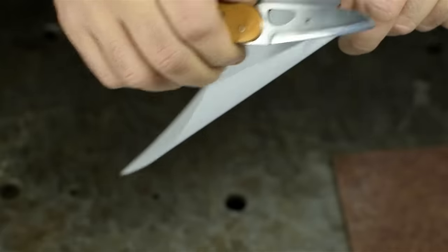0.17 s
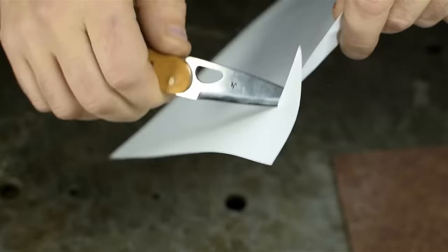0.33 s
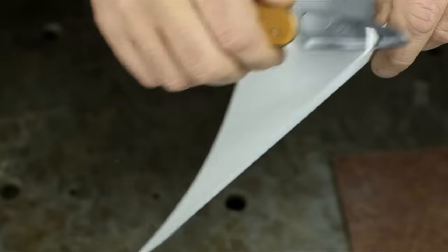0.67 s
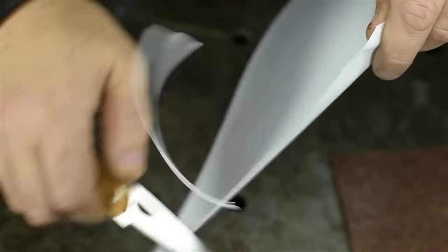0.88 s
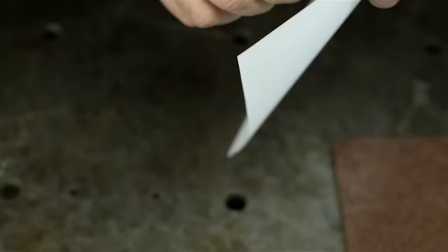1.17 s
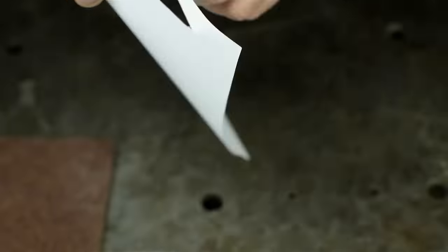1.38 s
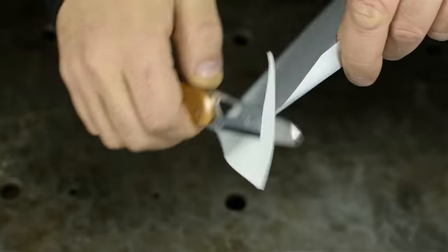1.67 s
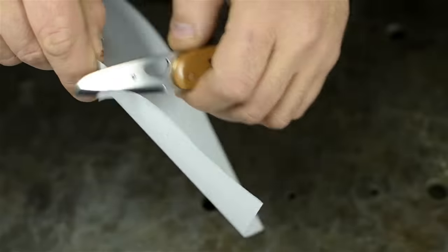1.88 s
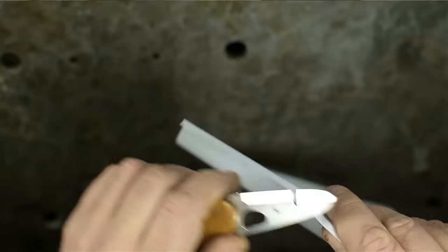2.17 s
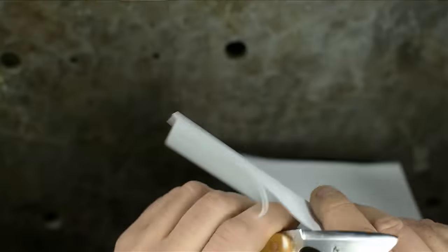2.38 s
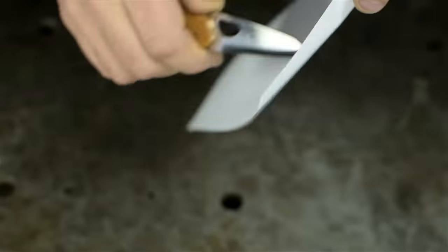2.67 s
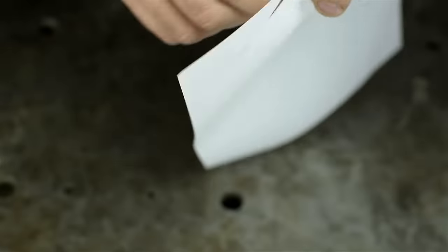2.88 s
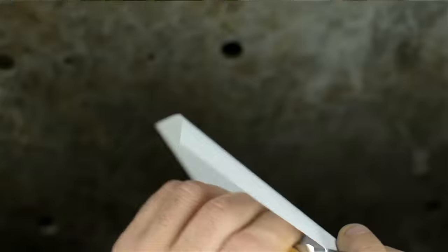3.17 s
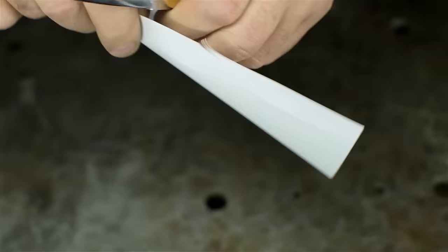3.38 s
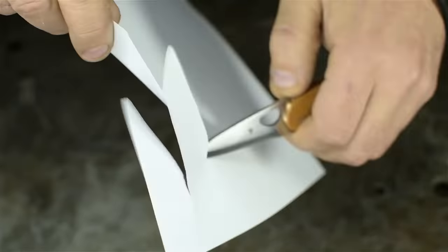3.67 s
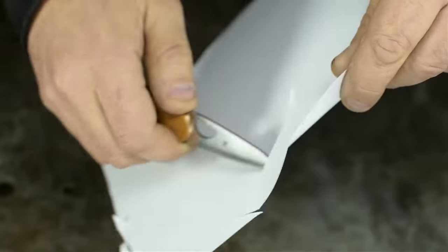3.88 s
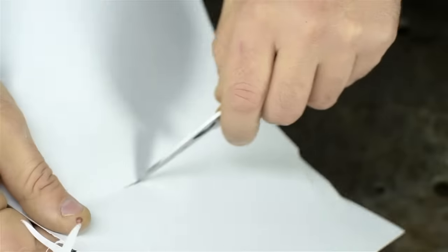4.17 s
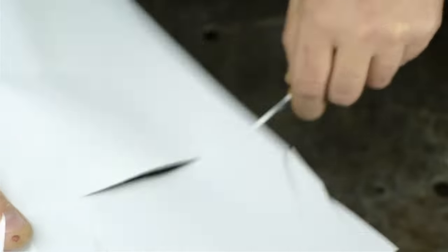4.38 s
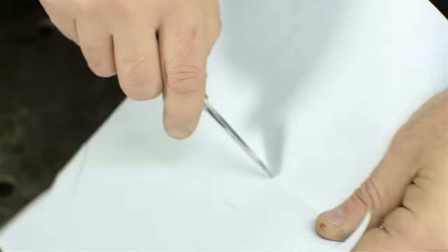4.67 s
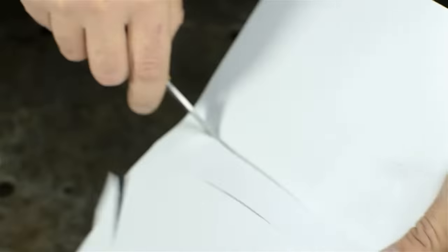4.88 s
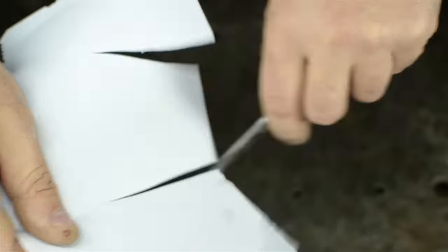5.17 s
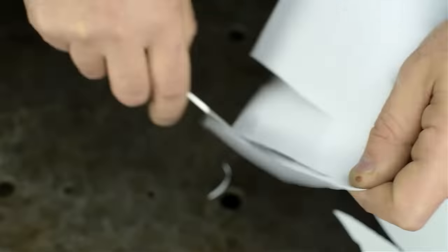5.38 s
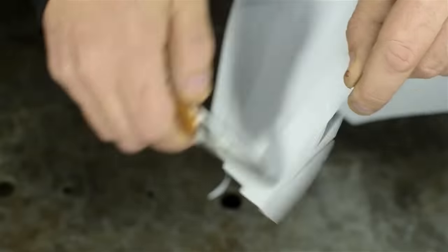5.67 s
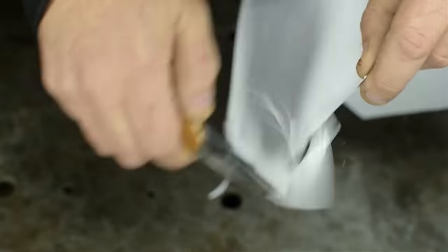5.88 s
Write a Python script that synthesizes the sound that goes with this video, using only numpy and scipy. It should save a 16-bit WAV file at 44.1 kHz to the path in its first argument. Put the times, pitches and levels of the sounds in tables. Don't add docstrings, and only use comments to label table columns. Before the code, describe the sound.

A knife shaves strips from a hand-held sheet of paper, very close to a small, thin-bassed microphone. Fast rasping strokes crackle and ring the sheet, with sharp ticks at bites and releases. The middle strokes grow brighter and hissier, then come long slits, faint rustles and a few last flicks. The quiet room adds only a short, dull tail.

```python
import sys
import numpy as np
from scipy import signal
from scipy.fft import rfft, irfft, next_fast_len
from scipy.io import wavfile
from scipy.ndimage import uniform_filter1d, map_coordinates

SR = 44100
rng = np.random.default_rng(int(sys.argv[2]) if len(sys.argv) > 2 else 0)


def decibels_to_gain(level_db):
    exponent = np.asarray(level_db, float) / 20
    return 10 ** exponent


def store_wav(level_fs):
    pcm = np.round(np.clip(np.atleast_2d(level_fs), -1, 1) * 32767)
    wavfile.write(sys.argv[1], SR, pcm.T.astype(np.int16))


N = 266319
HOP = 32

SETUP_START_S = [
    1.02,
    2.62,
    3.16,
    4.08,
    5.52,
]


def level(x, db):
    return x * decibels_to_gain(db) / np.sqrt(np.mean(x ** 2))


def shape_db(points, hz):
    f, db = np.transpose(points)
    return np.interp(np.log(hz), np.log(f), db)


def walk(rate, count=1):
    k = int(SR / HOP / rate)
    held = np.arange(N // HOP + 1) // k % 2000
    steps = rng.standard_normal((count, 2000))[:, held]
    return 1.025 * uniform_filter1d(uniform_filter1d(steps, k), k)


def glide(control):
    return np.interp(np.arange(N) / HOP, np.arange(len(control)), control)


def band(spectrum, hz, octaves):
    size = next_fast_len(N)
    bin_hz = np.maximum(np.arange(len(spectrum)) * SR / size, 1)
    away = np.log2(bin_hz / hz) / octaves
    return level(irfft(spectrum * np.cos(np.pi / 2 * np.clip(away, -1, 1)), size)[:N], 0)


def air():
    # pitch_hz, level_db (per Hz)
    air_colour = [(18, -39), (30, -30.5), (195, -5), (1140, -6.5), (2030, -12), (3230, -11), (10200, -19.5),
                  (15000, -36)]
    size = next_fast_len(N)
    hz = np.maximum(np.arange(size // 2 + 1) * SR / size, 1)
    white = rfft(rng.standard_normal(size))
    tone = level(irfft(white * decibels_to_gain(shape_db(air_colour, hz)), size)[:N], -78.5)
    tone = tone * decibels_to_gain(glide(walk(8.4)[0]))
    hum_db = np.where(np.arange(N) / SR < SETUP_START_S[0], -92, -104)
    return tone + band(white, 98, 0.99) * decibels_to_gain(hum_db)


def snaps():
    # time_s, peak_db, ring_hz, top_db (relative)
    snap_events = [(0.0345, -59, 1900, -21), (0.0408, -60, 1000, -23), (0.1942, -43, 3700, -7),
                   (0.3069, -18, 2300, -8), (0.3915, -34, 3400, 6), (0.4568, -42, 2900, -9),
                   (0.5095, -26, 1300, -17), (0.5429, -23, 1300, -12), (0.5625, -28, 800, -20),
                   (0.76, -28, 1300, -15), (0.9387, -28, 1600, -28), (1.0465, -51, 3600, -17),
                   (1.265, -26, 2500, -14), (1.6023, -20, 4700, -18), (1.7815, -24, 3900, -13),
                   (1.8667, -21, 2700, -21), (1.927, -21, 3300, -14), (2.135, -24, 2600, -26),
                   (2.1637, -24, 3200, -18), (2.3982, -43, 3900, -11), (2.5502, -21, 3900, -20),
                   (2.5721, -34, 3400, -12),
                   (2.7215, -29, 4000, -8), (2.8842, -26, 5000, -5), (3.1022, -36, 4700, -4),
                   (3.1171, -40, 4100, -7), (3.398, -35, 3200, -9), (3.4162, -30, 2700, -11),
                   (3.4818, -45, 2800, -9), (3.562, -23, 4400, -14), (4.0587, -41, 4400, -5),
                   (4.4092, -33, 2600, -21), (4.4242, -38, 2300, -13), (4.4489, -43, 2200, -23),
                   (4.5075, -54, 3500, -15), (4.5544, -51, 3000, -16), (4.7917, -25, 1700, -8),
                   (4.832, -23, 1400, -12), (5.0505, -43, 2100, -22), (5.0708, -32, 2800, -13),
                   (5.4246, -24, 4300, 5), (5.4485, -32, 2700, -25), (5.5782, -33, 4700, 1),
                   (5.5875, -36, 3500, -6), (5.981, -46, 2700, -11)]
    events = snap_events
    out, t = np.zeros(N + 1024), np.arange(1024) / SR
    chance = rng.standard_normal((len(events), 1024))
    for (s, db, hz, top_db), noise in zip(events, chance):
        cycles = hz * t - 1
        ring = 1.1 * np.cos(2 * np.pi * cycles) * np.exp(-(cycles / .7) ** 2)
        ring = ring * decibels_to_gain(-max(top_db + 8, 0))
        crack = np.diff(noise, prepend=0) * np.exp(-np.abs(t - 1 / hz) / .0002)
        tail = noise * np.exp(-t / 0.0021)
        i = int((s - 1 / hz) * SR)
        out[i:i + 1024] += decibels_to_gain(db) * (ring + .5 * decibels_to_gain(min(top_db, 0)) * crack + .05 * tail)
    return signal.sosfilt(signal.butter(2, 500, "high", fs=SR, output="sos"), out[:N])


def squeals():
    # time_s, length_s, start_hz, end_hz, level_db, roughness (0-1)
    songs = [(0.11, 0.027, 3920, 3920, -73.5, 0.3), (1.745, 0.039, 1900, 1500, -39, 0.9),
             (4.46, 0.17, 3130, 3130, -76, 0.5), (4.5, 0.11, 6100, 6150, -72, 1),
             (4.778, 0.036, 1145, 1370, -33, 0), (0.36, .055, 880, 630, -56.5, 0.9),
             (.27, 0.046, 610, 900, -47, 0.7), (5.37, 0.066, 600, 450, -60.5, 0.84),
             (1.76, 0.031, 470, 610, -62, 1), (2.52, 0.035, 760, 720, -51.5, 1),
             (3.546, 0.043, 490, 470, -61.5, .8), (3.665, 0.068, 500, 460, -60, 0.4)]
    out, wobble = np.zeros(N), walk(180, count=2)
    slip = glide(wobble[0]) + 1j * glide(wobble[1])
    for s, length, start_hz, end_hz, db, rough in songs:
        i, n = int(s * SR), int(length * SR)
        phase = 2 * np.pi * np.cumsum(np.linspace(start_hz, end_hz, n)) / SR
        stumble = 1 + rough * slip[i:i + n]
        out[i:i + n] += decibels_to_gain(db) * np.hanning(n) ** .5 * np.real(stumble * np.exp(1j * phase))
    return out


def effort(t):
    # start_s (blade enters), full_s (full bite), end_s (blade leaves)
    stroke_times = [(.186, .27, .348), (.45, .48, .626), (.665, .756, .91), (1.05, 1.13, 1.208),
                    (1.24, 1.3, 1.406), (1.42, 1.44, 1.538), (1.585, 1.612, 1.73), (1.87, 1.924, 1.97),
                    (1.93, 1.964, 2.096), (2.157, 2.17, 2.262), (2.388, 2.432, 2.515), (2.49, 2.518, 2.547),
                    (2.63, 2.68, 2.736), (2.785, 2.83, 2.888), (2.925, 2.97, 3.052), (3.158, 3.25, 3.35),
                    (3.46, 3.56, 3.715), (3.76, 3.814, 3.88), (3.82, 3.88, 4.042), (4.145, 4.172, 4.206),
                    (4.214, 4.229, 4.388), (4.764, 4.785, 4.953), (5.082, 5.108, 5.198),
                    (5.301, 5.375, 5.424)]
    # full_db, end_db, then relative flex_db (sheet), hiss_db (edge), fizz_db (fibres)
    stroke_levels = [(-41.5, -39, -7, -7.5, -2.5), (-47, -38, -9, -7, -1.5), (-40.5, -38.5, -9, -5, 2),
                     (-41.5, -37.5, -14.5, -1.5, -4), (-36, -43, -12.5, -4, -10),
                     (-40.5, -39.5, -12, -1.5, -9.5), (-47, -40.5, -14, -0.5, -2),
                     (-37.5, -36.5, -15, -8.5, -10.5), (-37.5, -32.5, -11.5, -3.5, -4.5),
                     (-41.5, -45, -16.5, 4, -2), (-40, -42.5, -21, 3.5, 2), (-33, -36, -15.5, 0.5, -7),
                     (-45, -44.5, -16.5, -0.5, -4), (-46.5, -43, -23, 1, 0.5), (-52, -41, -19, 4, 2.5),
                     (-44.5, -36, -12.5, -1.5, -1.5), (-47, -43, -7, -1, -4), (-42, -43, -15.5, -2, -3.5),
                     (-46.5, -46, -13, -0.5, -2), (-42.5, -43, -8.5, 4.5, 2.5), (-42.5, -47, -2, 5.5, 2.5),
                     (-43, -47, 0.5, 4.5, 5), (-39, -42, -6, 1.5, -2), (-35.5, -41, -7, -1, -7)]
    # start_s, end_s
    drag_times = [(.372, .403), (.92, .95), (1.7, 1.792), (1.836, 1.886), (2.296, 2.312), (2.548, 2.58),
                  (2.728, 2.79), (3.045, 3.145), (3.33, 3.385), (3.398, 3.419), (3.438, 3.48),
                  (3.72, 3.755), (4.048, 4.066), (4.088, 4.155), (4.385, 4.452), (4.45, 4.56),
                  (4.55, 4.635), (4.625, 4.722), (4.728, 4.762), (5.044, 5.09), (5.296, 5.36),
                  (5.428, 5.452), (5.535, 5.562), (5.568, 5.648), (5.66, 5.69), (5.704, 5.76), (5.8, 5.857),
                  (5.9, 5.927), (5.932, 5.95), (5.96, 6.03)]
    # first_db, last_db, brightness_db
    drag_levels = [(-65, -56, -6.5), (-42.5, -46, -12), (-43, -40.5, -8), (-47.5, -50.5, -8),
                   (-58.5, -68, -2), (-43, -54, -16), (-55, -58.5, 4), (-48.5, -64.5, 0), (-38, -45.5, 0),
                   (-42, -50, -2.5), (-59, -71, -17), (-49.5, -53, 1.5), (-67, -56, 5.5), (-72.5, -63, 13),
                   (-52, -63, -5), (-76, -80, -2.5), (-76.5, -61, 4), (-56, -45.5, 1.5), (-43.5, -39, 2),
                   (-58.5, -51.5, 2), (-48.5, -39.5, 0), (-62, -66, -10), (-70, -73, 9.5), (-49, -54, 5),
                   (-77, -59, -1), (-43.5, -52, 4.5), (-48.5, -48.5, 6), (-50.5, -49, 7.5),
                   (-36.5, -40, -4.5), (-65, -87, -2)]
    setup_flex = [-7, -15, -8, -4.5, -3, -15]
    # gain_db (along the stroke), drop_db (as the blade leaves), fade_db_per_s (after it)
    zone_shape = [
        (0, -6.5, -330),
        (-1, -13, -300),
        (1.5, -19.5, -280),
        (4.5, -26, -240),
    ]

    rows = [when + row for when, row in zip(stroke_times, stroke_levels)]
    for (start, end), (first_db, last_db, bright) in zip(drag_times, drag_levels):
        flex_db = setup_flex[np.searchsorted(SETUP_START_S, start)] - 0.6 * bright
        fizz_db = 1.04 * bright - 1.5
        rise_s = 0.017
        rows.append((start, start + rise_s, end, first_db, last_db, flex_db, bright, fizz_db))
    start, full, end, full_db, end_db, flex_db, hiss_db, fizz_db = np.array(rows).T[:, :, None]

    bite_db = -22.5 * np.clip((full - t) / (full - start), 0, 1) ** 1.05
    cut_db = full_db + bite_db + (end_db - full_db) * np.clip((t - full) / (end - full), 0, 1)
    along = np.clip((t - start) / (end - start), 0, 1) - .5
    after = np.maximum(t - end, 0)
    let_go = 1 - np.exp(-after / .0075)
    silent_db = -110
    zones = []
    for tone_db, (gain_db, drop_db, fade_db) in zip((flex_db, 0, hiss_db, fizz_db), zone_shape):
        stroke_db = cut_db + tone_db + gain_db * along + drop_db * let_go + fade_db * after
        zones.append(np.where(t < start, silent_db, stroke_db).max(axis=0).clip(silent_db))
    return np.array(zones)


def fibres(per_s, spread_db, rub_db):
    when, size, rub = rng.random(N), rng.exponential(size=N), rng.standard_normal((2, N))
    clicks = (when < per_s / SR) * decibels_to_gain(spread_db * np.minimum(size, 3.5)) * np.sign(rub[0])
    return level(clicks, 0) + decibels_to_gain(rub_db) * rub[1]


def cut():
    zone_borders = [1400, 4500, 9000]
    # pitch_hz, level_db (per Hz)
    setup_1 = [(120, -65), (200, -32), (774, 0), (1140, -2), (2730, 8), (3280, 1), (4080, 8), (6110, -7),
               (6690, 3.5), (10000, -9), (13900, -7.5), (15800, -27)]
    setup_2 = [(120, -71), (200, -40), (567, -16), (719, -18.5), (1020, -2), (1790, -6), (2540, -6.5),
               (3460, -2.5), (6810, -2), (9130, -12.5), (11000, 0), (15800, -3)]
    setup_3 = [(120, -72), (200, -45), (929, -28), (1060, -12), (1180, -29), (1610, -6), (2940, -7),
               (5280, 4), (10000, -3.5), (12500, -20), (15800, -4.5)]
    setup_4 = [(120, -72), (200, -38), (472, -23), (527, -22), (760, -12.5), (1240, 0.5), (2150, -7.5),
               (3590, 0.5), (4810, -4.5), (5890, 2), (9130, -12.5), (15800, -5)]
    setup_5 = [(120, -69), (200, -37.5), (472, -25.5), (706, -21), (774, -12.5), (981, -1.5), (1220, 0.5),
               (2110, -8), (5780, -7), (6940, -5), (8960, -22.5), (15800, -15)]
    setup_6 = [(120, -74), (200, -51), (999, -19.5), (1220, -25), (1310, -11), (1700, -6), (3050, -8),
               (4810, 0), (6450, -8), (9300, -5.5), (11400, -19.5), (15800, -7)]
    setups = (setup_1, setup_2, setup_3, setup_4, setup_5, setup_6)

    t = np.arange(N // HOP + 1) * HOP / SR
    zone_db = effort(t)
    step = np.arange(51)
    centres = 200 * 2 ** (step / 8)
    zone, setup = np.searchsorted(zone_borders, centres), np.searchsorted(SETUP_START_S, t)
    power = np.array([decibels_to_gain(shape_db(h, centres)) ** 2 * centres for h in setups])
    zone_power = np.array([power[:, zone == z].sum(axis=1) for z in zone]).T
    share = np.sqrt(power / zone_power)

    place = step[:, None] + 2.61 * walk(9)
    where = [place, np.arange(len(t)) + 0 * place]
    comb = map_coordinates(walk(14, count=51), where, order=1, mode="mirror")
    clumps = 3.1 * uniform_filter1d(walk(70, count=51), size=3, axis=0)
    depth_db = np.interp(np.log(centres), np.log([500, 12000]), [5.5, 3.0])[:, None]
    colour = share[setup].T * decibels_to_gain(depth_db * comb + 2.0 * clumps)
    energy = np.array([np.sum(colour[zone == z] ** 2, axis=0) for z in range(4)])
    colour /= np.sqrt(energy)[zone]

    edge_db = uniform_filter1d(zone_db[zone], size=3, axis=0)
    judder_db = 1.35 * walk(45) + 2.1 * walk(170)
    gain = colour * decibels_to_gain(edge_db + judder_db - 2.5)
    source = rfft(fibres(per_s=4000, spread_db=2.5, rub_db=-3.0), next_fast_len(N))
    return sum(glide(g) * band(source, hz, 1 / 8) for g, hz in zip(gain, centres))


def room(x):
    t60_s, tail_db = 0.07, -25.5
    t = np.arange(SR // 3) / SR
    tail = rng.standard_normal(len(t)) * np.exp(-np.log(1000) * t / t60_s) * (t > .003)
    tail = signal.lfilter([1], [1, -.4], tail)
    return signal.fftconvolve(x, tail * decibels_to_gain(tail_db) / np.sqrt(np.sum(tail ** 2)))[:N]


def scene():
    paper = cut() + snaps() + squeals()
    return (paper + room(paper) + air())[None]


def low_pass(x):
    return signal.sosfilt(signal.butter(12, 16450, fs=SR, output="sos"), x)


def record(dry):
    x = signal.sosfilt(signal.butter(2, 150, "high", fs=SR, output="sos"), dry)
    x = signal.sosfilt(signal.ellip(10, .2, 70, 15900, fs=SR, output="sos"), x)
    return low_pass(x)


dry = scene()
out = record(dry)
store_wav(out)
```